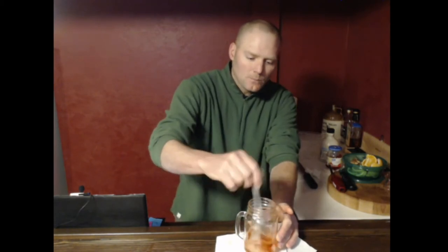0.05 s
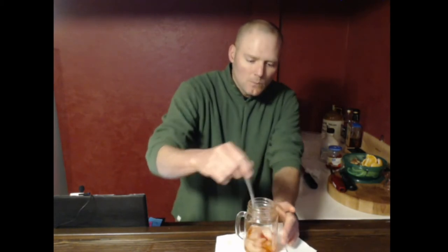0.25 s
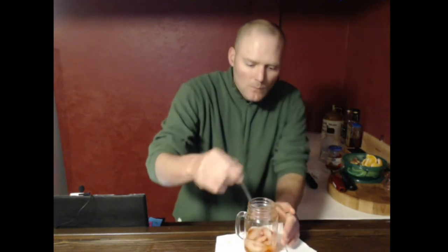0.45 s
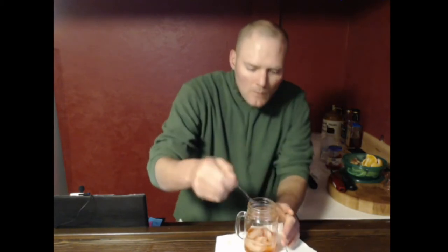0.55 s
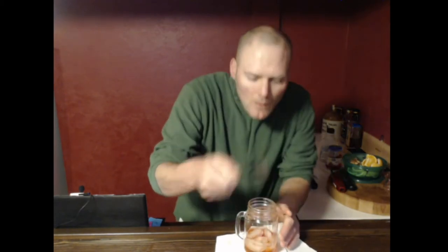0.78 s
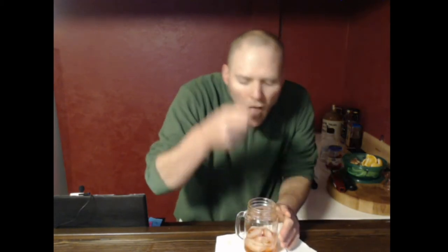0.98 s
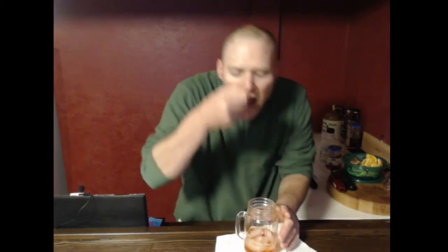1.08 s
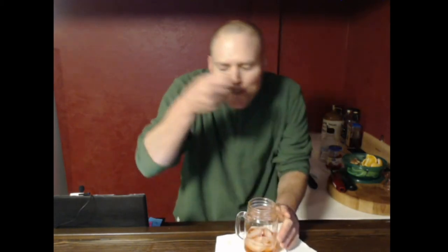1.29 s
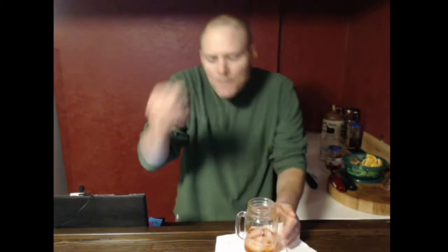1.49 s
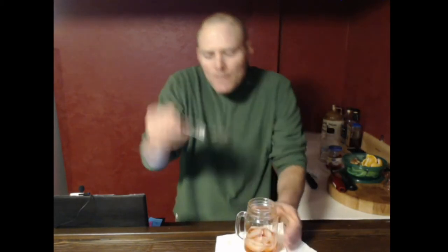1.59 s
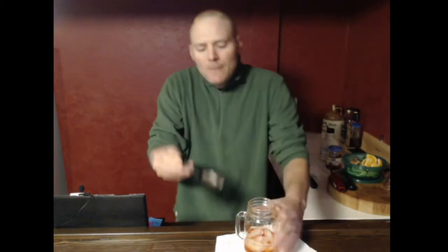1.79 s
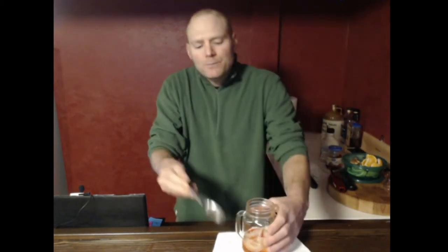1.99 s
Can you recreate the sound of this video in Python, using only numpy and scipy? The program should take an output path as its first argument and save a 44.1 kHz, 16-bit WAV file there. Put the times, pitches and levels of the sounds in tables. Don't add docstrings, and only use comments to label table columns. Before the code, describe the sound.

A metal spoon clinks rapidly against a thick glass mug of ice and drink, then stops

```python
import sys
import numpy as np
from scipy import signal
from scipy.fft import rfft, irfft, next_fast_len
from scipy.io import wavfile
from scipy.ndimage import uniform_filter1d

SR = 44100
rng = np.random.default_rng(int(sys.argv[2]) if len(sys.argv) > 2 else 0)


def persist_wave(psi):
    counts = np.round(np.clip(psi, -1, 1) * 32767).astype(np.int16)
    wavfile.write(sys.argv[1], SR, np.atleast_2d(counts).T)


def convert_level_to_amplitude(level_db):
    exponent = np.asarray(level_db, float) / 20
    return 10 ** exponent


N = 90404
RISE_S = 0.00021


def unit(x):
    return x / np.sqrt(np.mean(x ** 2) + 1e-20)


def along(points, hz):
    point_hz, value = np.transpose(points)
    return np.interp(np.log(hz + 1), np.log(point_hz + 1), value)


def filtered(x, response):
    size = next_fast_len(N + SR // 2)
    gain = response(np.fft.rfftfreq(size, 1 / SR))
    return irfft(rfft(x, size) * gain, size)[..., :N]


def high_pass(x, edge_hz):
    return filtered(x, lambda hz: hz ** 2 / (hz ** 2 + edge_hz ** 2))


def colored_noise(curve):
    return filtered(rng.standard_normal(N), lambda hz: convert_level_to_amplitude(along(curve, hz)))


def blurred(hz, t):
    hz = np.reshape(hz, (-1, 1))
    drift = np.cumsum(rng.standard_normal((len(hz), len(t))), axis=1)
    waver = 0.015 * (hz / 3000) ** 2
    return np.sin(2 * np.pi * hz * t + waver * drift)


def ring(modes, t, scatter_db=0):
    hz, db, t60 = np.transpose(modes)[:, :, None]
    luck_db = scatter_db * rng.standard_normal((len(modes), 1))
    decay = convert_level_to_amplitude(db + luck_db - 60 * t / t60)
    return (decay * (1 - np.exp(-t / RISE_S)) * blurred(hz, t)).sum(0)


def contacts(rows):
    out, t = np.zeros(N + SR), np.arange(SR // 5) / SR
    for start_s, peak_db, pitch_hz, t60_s in rows:
        rough = 1 + 0.35 * 3 * uniform_filter1d(rng.standard_normal(len(t)), size=9)
        envelope = convert_level_to_amplitude(peak_db - 60 * t / t60_s) * (1 - np.exp(-t / RISE_S))
        out[round(start_s * SR):][:len(t)] += envelope * rough * blurred(pitch_hz, t)[0]
    return out[:N]


# start_s, wall_db, twin_db, clatter_db
BLOWS = [(.0004, -26, -37, -23.5), (0.014, -21, -34.5, -31.5), (0.038, -25, -28, -32),
         (0.046, -26.5, -34, -36.5), (0.0535, -14, -29, -33), (0.0599, -8, -6.5, -20.5),
         (0.09, -21, -24, -41), (.078, -16.5, -29, -31), (0.114, -20.5, -41, -36.5),
         (0.1733, -27.5, -44, -38.5), (.203, -51, -38, -35), (0.215, -3, -24.5, -18),
         (0.284, -38, -31.5, -41), (0.369, -55, -52, -29.5), (0.377, -46, -35.5, -39.5),
         (.398, -35.5, -32.5, -38), (0.415, -27.5, -33.5, -42), (0.423, -21.5, -30, -26),
         (0.441, -39, -26.5, -30), (0.558, -40, -57, -45), (0.581, -43, -61, -67.5),
         (.609, -40.5, -55, -61), (0.689, -46.5, -62, -48), (1.841, -42.5, -67, -58),
         (1.8872, -40, -52.5, -67), (1.948, -27.5, -65, -42), (1.983, -48, -46, -49.5),
         (2.0104, -44, -48.5, -31), (2.0188, -25.5, -55.5, -54), (2.036, -47, -61, -39)]
# pitch_hz, level_db, t60_s
WALL_MODES = [(2868, 0, .085), (2730, -20, .1), (2420, -19, .11)]
# pitch_hz, level_db, t60_s
TWIN_MODES = [(3150, 0, .15), (3290, -17, .1)]
# pitch_hz, level_db, t60_s
CLATTER_MODES = [(3560, -14.5, 0.047), (3750, -3.5, 0.045), (4080, -7, 0.042), (4320, -29.5, 0.1),
                 (4780, 1, 0.051), (5300, -25, .08), (5730, -4, 0.037), (6000, -13, 0.19),
                 (6240, -12.5, 0.19)]
# pitch_hz, level_db
ICE_COLOR = [(300, 11.5), (1000, -6), (2000, -6.5), (3000, 12.5), (5500, 3.5), (8000, -8)]


def mug():
    scatter_db = 5.5
    crack_db, crack_t60_s, crack_low_hz = 2.5, 0.0037, 1500
    ice_db, ice_t60_s = -6, 0.16
    ringing, crack_level, ice_level = np.zeros((3, N + SR))
    t = np.arange(SR // 3) / SR
    for start_s, wall_db, twin_db, clatter_db in BLOWS:
        span = slice(round(start_s * SR), round(start_s * SR) + len(t))
        ringing[span] += convert_level_to_amplitude(wall_db) * ring(WALL_MODES, t)
        ringing[span] += convert_level_to_amplitude(twin_db) * ring(TWIN_MODES, t)
        ringing[span] += convert_level_to_amplitude(clatter_db - 7) * ring(CLATTER_MODES, t, scatter_db)
        crack_level[span] += convert_level_to_amplitude(clatter_db + crack_db - 60 * t / crack_t60_s)
        ice_level[span] += convert_level_to_amplitude(clatter_db + ice_db - 60 * t / ice_t60_s)
    rattle = unit(colored_noise(ICE_COLOR))
    crack = high_pass(rng.standard_normal(N), crack_low_hz)
    return ringing[:N] + ice_level[:N] * rattle + crack_level[:N] * crack


# start_s, peak_db, pitch_hz, t60_s
ICE_NOTES = [(.0002, -2, 2850, 0.0067), (.002, -30, 4750, 0.14), (.06, -14.5, 970, .01),
             (.0615, -22, 3750, 0.17), (.2158, -16, 6010, 0.063), (2.0105, -19, 5000, 0.0044),
             (.443, -26.5, 240, 0.063), (.078, -24, 4080, .1), (.13, -34, 354.5, .15),
             (.2147, -3.5, 1000, .004), (.2155, -21.5, 5730, 0.14), (.219, -23.5, 642, .12),
             (.224, -21, 2426, .1), (.368, -30, 652, .12), (.368, -22, 1200, .006),
             (.372, -33.5, 358.8, 0.28), (.369, -30, 3750, 0.046), (.408, -29, 5300, .05),
             (.4225, -18, 604, 0.074), (.4232, -24, 5770, 0.069), (.426, -22, 3560, .07),
             (.432, -30.5, 4890, .07), (.44, -33, 373, .1), (.462, -32.5, 629, .15),
             (1.999, -40.5, 4360, .03), (2.0095, -21, 4093, .04), (2.0095, -16.5, 5830, .012),
             (2.036, -36.5, 1470, .04), (.377, -33, 3284, 0.098)]


def ice_and_spoon():
    return contacts(ICE_NOTES)


# pitch_hz, density_db (per Hz)
AIR_COLOR = [(25, -17.5), (90, -23.5), (178, -4.5), (400, -19), (900, -22.5), (3000, -24.5), (7000, -27.5),
             (9000, -45.5)]
# pitch_hz, width_hz, rms_db
HUM_MODES = [(127, 15, -56), (182.5, 23, -46.5), (240, 17.3, -50.5), (361.4, 15.6, -62), (556, 150, -61),
             (880, 56, -62)]


def fridge_and_air():
    air = colored_noise(AIR_COLOR)
    band_rms = np.std(filtered(air, lambda hz: (hz > 1000) & (hz < 7000)))
    out = convert_level_to_amplitude(-50) * air / band_rms
    for pitch_hz, width_hz, rms_db in HUM_MODES:
        mode = filtered(rng.standard_normal(N), lambda hz: np.exp(-((hz - pitch_hz) / width_hz) ** 2))
        out += convert_level_to_amplitude(rms_db) * unit(mode)
    return out


# pitch_hz, t60_s
ROOM_DECAY = [(300, .32), (3000, .27), (8000, .2)]


def room(x):
    out, step, delay = np.zeros(N + SR), 2646, 150
    for at in range(0, N, step):
        hz, t, spectrum = signal.stft(rng.standard_normal(SR // 3), SR, nperseg=256)
        fade = convert_level_to_amplitude(-60 * t / along(ROOM_DECAY, hz)[:, None])
        tail = signal.istft(spectrum * fade, SR, nperseg=256)[1]
        wet = signal.fftconvolve(x[at:at + step], tail / np.linalg.norm(tail))
        out[at + delay:][:len(wet)] += wet
    return out[:N]


# start_s, peak_db, pitch_hz, t60_s
NAPKIN_SNAPS = [(.855, -37, 367.3, .15), (.94, -38.5, 1680, .02), (1.6545, -33, 6000, .003),
                (1.665, -35, 1700, 0.017), (1.6712, -14.5, 4520, .003), (1.673, -23.5, 6500, .008),
                (1.6765, -17.5, 5400, .007), (1.6785, -21.5, 6300, 0.016), (1.6805, -48.5, 3900, .01),
                (1.6825, -26, 6900, 0.0059), (1.6835, -23, 3900, 0.019), (1.684, -36.5, 1450, 0.051),
                (1.696, -37.5, 3860, .06), (1.705, -45, 6000, .006), (1.7245, -37, 3830, .01),
                (1.739, -43, 4500, 0.0066), (2.043, -35.5, 4080, .04)]


def napkin():
    return contacts(NAPKIN_SNAPS)


# pitch_hz, level_db
MIC_EDGE = [(7300, 0.5), (7850, -10), (8600, -10.5), (9100, -41)]


def scene():
    glass = mug()
    small = ice_and_spoon() + napkin()
    wet = convert_level_to_amplitude(-15) * room(glass + convert_level_to_amplitude(5) * small)
    near = high_pass(glass + small + wet, 110)
    heard = filtered(near + fridge_and_air(), lambda hz: convert_level_to_amplitude(along(MIC_EDGE, hz)))
    return np.tile(heard, (2, 1))


def roll_off(x):
    return signal.sosfilt(signal.butter(12, 16100, fs=SR, output="sos"), x)


def record(dry):
    clip_top, clip_hard = 0.42, 6
    side_db, side_s = -24, 0.012
    x = dry + 0.03 * high_pass(dry ** 2, 400)
    x = x / (1 + np.abs(x / clip_top) ** clip_hard) ** (1 / clip_hard)
    x = filtered(x, lambda hz: 1 - 0.65 / (1 + (hz / 90) ** 4))
    loudness = np.abs(uniform_filter1d(x[0] ** 2, int(side_s * SR))) / clip_top
    hiss = filtered(rng.standard_normal(N), lambda hz: np.clip(hz / 2500, 0.15, 1.4))
    side = convert_level_to_amplitude(side_db) * loudness * hiss
    return roll_off(x + [side, -side])


dry = scene()
out = record(dry)
persist_wave(out)
```